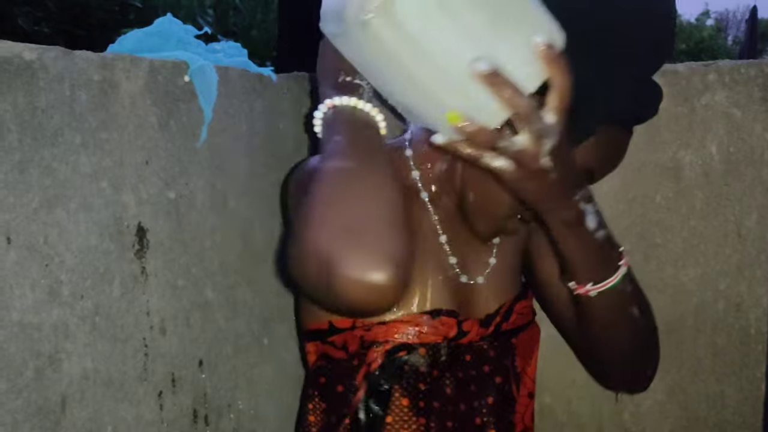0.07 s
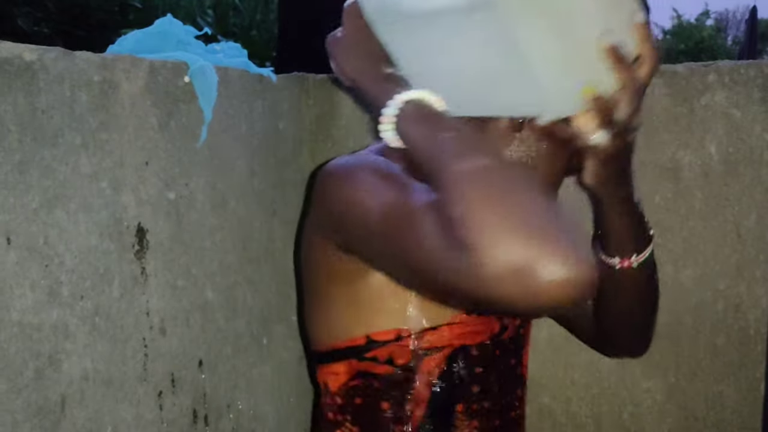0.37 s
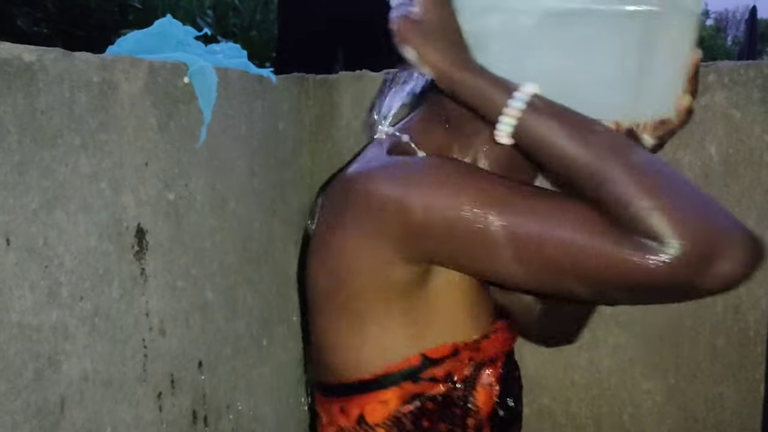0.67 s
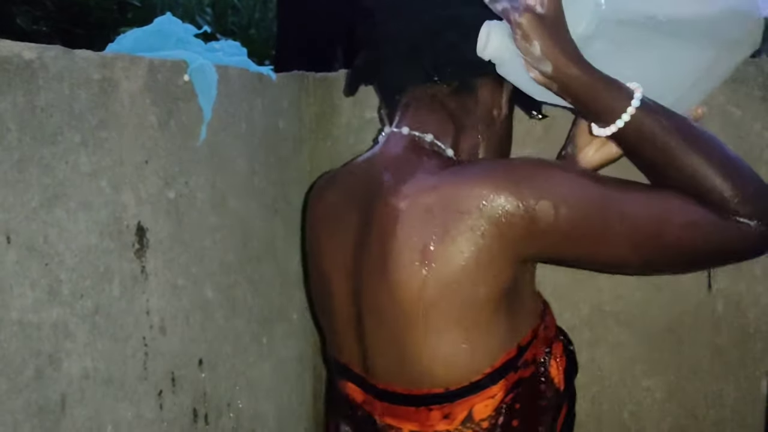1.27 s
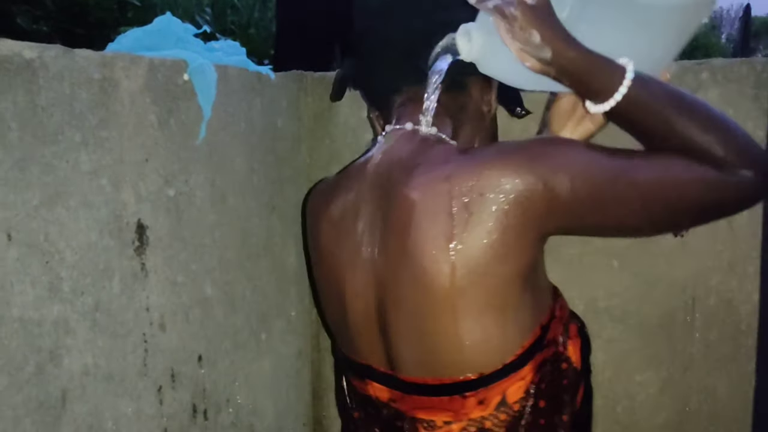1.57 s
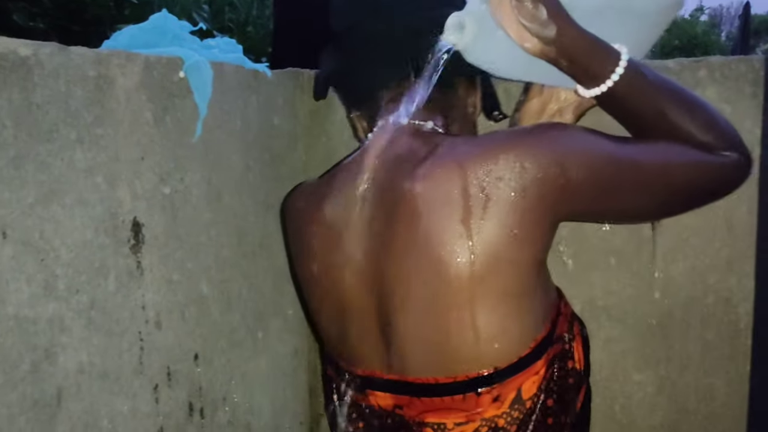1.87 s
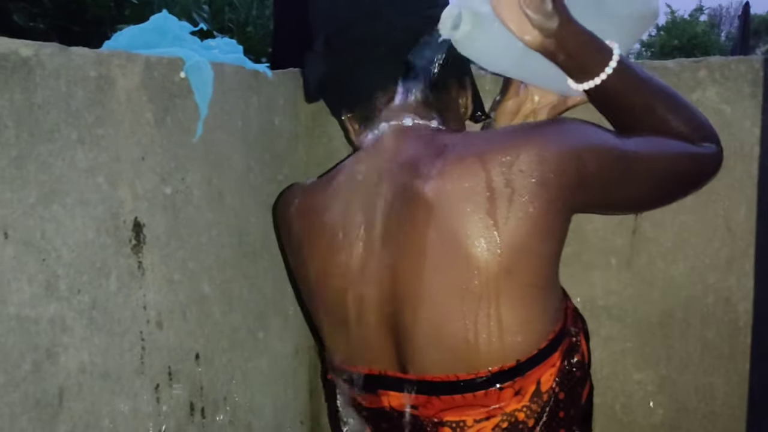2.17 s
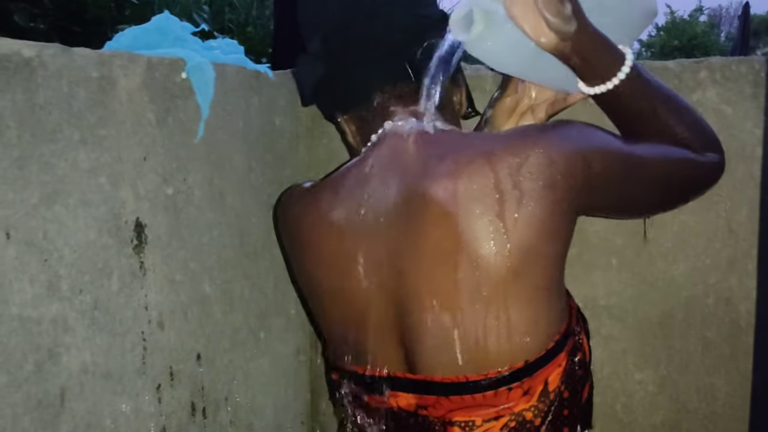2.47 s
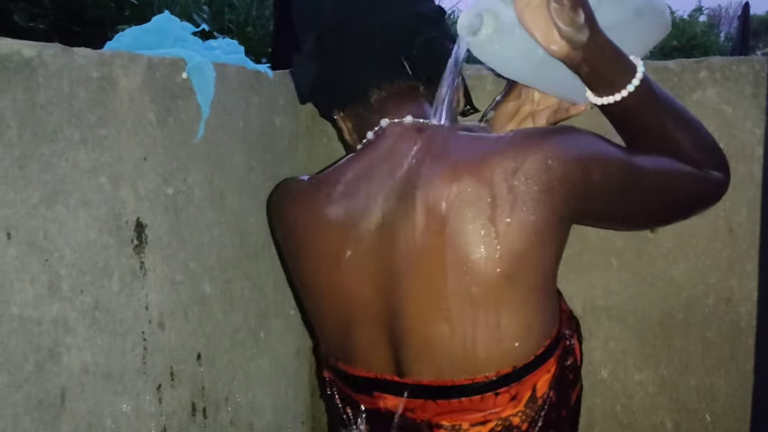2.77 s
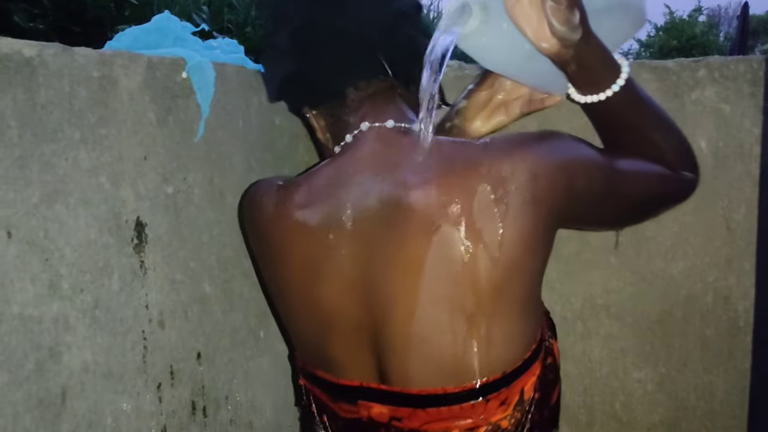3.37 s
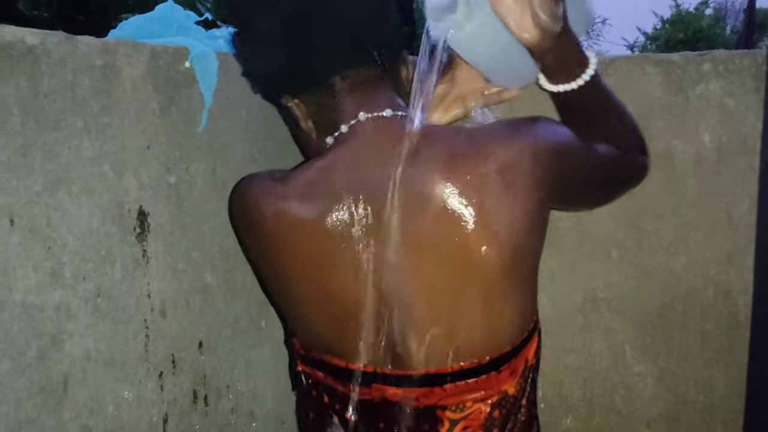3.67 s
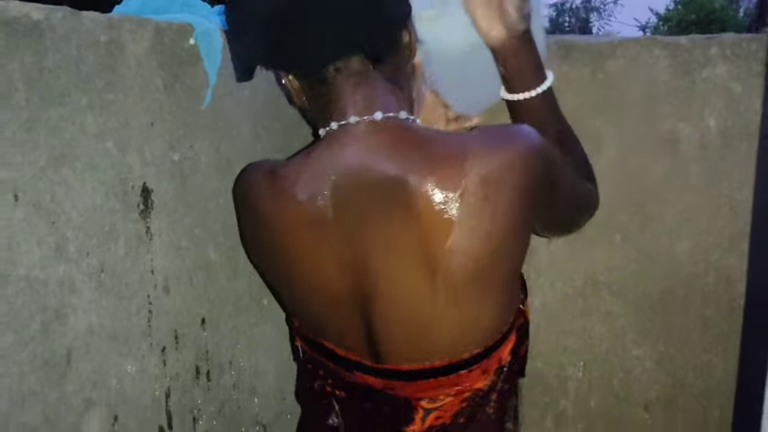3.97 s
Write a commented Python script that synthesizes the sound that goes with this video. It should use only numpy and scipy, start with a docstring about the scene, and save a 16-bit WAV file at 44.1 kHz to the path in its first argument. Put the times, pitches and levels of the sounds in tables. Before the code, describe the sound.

Water poured from a jug splashes unevenly over a body onto wet ground, with crickets buzzing.

```python
"""In a walled yard at dusk, crickets buzz throughout, their wing strokes exciting brief resonances.
From the start, water poured from a plastic jug over someone's shoulders trickles off and slaps on
the wet ground in uneven dollops, each a crowd of tiny impacts. Small bubbles ring as their trapped
air vibrates, and in the first two seconds the hollow jug gulps. The splashes thin out after three
seconds; at the very end come two more, and the walls of the jug thump once."""
import sys
import numpy as np
from scipy import signal
from scipy.fft import rfft, irfft
from scipy.io import wavfile

SR = 44100
rng = np.random.default_rng(int(sys.argv[2]) if len(sys.argv) > 2 else 0)


def waveform_to_disk(signal):
    """Save audio, clipped to [-1, 1], as 16-bit WAV at the path in sys.argv[1]."""
    frames = np.transpose(np.atleast_2d(signal))
    scaled = np.clip(frames, -1, 1) * 32767
    samples = np.round(scaled).astype(np.int16)
    wavfile.write(sys.argv[1], SR, samples)


N = 176400


def dollops():
    """Impact noise: lumps of water strike the wet ground at uneven intervals."""
    # Each row: start in seconds, relative slap and spray levels in dB, rise and decay in seconds,
    # low edge of the slap in Hz, treble gain in dB.
    splashes = [(0.118, -43, -26.5, 0.0054, 0.018, 2500, 8), (0.138, -43, -35, 0.003, 0.018, 2500, 18),
                (0.153, -31.5, -14, 0.0012, 0.0087, 2520, -18), (0.227, -39, -33.5, 0.005, 0.01, 2400, 5),
                (0.435, -36.5, -28, 0.001, 0.027, 2500, -3), (0.486, -43, -35, 0.001, 0.019, 2520, 12),
                (0.6, -39, -32, 0.001, 0.02, 2500, 8), (0.644, -41, -28, 0.004, 0.012, 2500, 14),
                (0.663, -44, -25.5, 0.0026, 0.017, 2500, 8), (0.7, -25.5, -21, 0.0013, 0.01, 2130, -1),
                (0.794, -41, -22.5, 0.00084, 0.02, 2500, -6), (0.849, -43, -30, 0.0036, 0.013, 2500, -4),
                (0.941, -26.5, -13, 0.00064, 0.015, 2200, -4.5),
                (0.975, -16, -15.5, 0.0025, 0.018, 2370, -3), (1.008, -50, -21, 0.0032, 0.0085, 2500, 4),
                (1.117, -27.5, -13, 0.0011, 0.0085, 2430, -6),
                (1.135, -32.5, -20.5, 0.01, 0.037, 2700, 5.5),
                (1.168, -26.5, -26.5, 0.0012, 0.022, 2960, -10), (1.229, -24, -21, 0.0096, 0.025, 2680, -8),
                (1.326, -35, -23, 0.014, 0.017, 2700, -1), (1.347, -25.5, -15.5, 0.0024, 0.012, 2600, -7),
                (1.372, -44, -22.5, 0.0043, 0.021, 2700, -5), (1.456, -20, -15.5, 0.0038, 0.023, 2300, -8),
                (1.471, -17, -22, 0.0012, 0.016, 2030, -4), (1.619, -21, -17, 0.0023, 0.011, 1590, -20),
                (1.642, -36, -24.5, 0.0031, 0.012, 2000, 5), (1.72, -34, -19.5, 0.003, 0.0095, 1700, -15),
                (1.797, -31, -20, 0.001, 0.023, 2800, -3), (2.109, -34, -21, 0.0023, 0.011, 2500, -3),
                (2.175, -36.5, -30, 0.0034, 0.0082, 2500, 5), (2.386, -34, -25, 0.0034, 0.053, 2550, -4),
                (2.505, -50, -25, 0.00092, 0.04, 2510, -25), (2.544, -36.5, -33.5, 0.0043, 0.049, 2600, 14),
                (2.586, -27, -18, 0.0012, 0.015, 2430, -17), (2.627, -24, -31, 0.00093, 0.016, 2800, -6),
                (2.686, -22.5, -19.5, 0.002, 0.014, 2920, -7), (2.764, -40, -29.5, 0.003, 0.019, 2300, 5),
                (2.783, -12, -19, 0.0013, 0.012, 2530, 0), (2.834, -41, -29, 0.002, 0.046, 2500, 6),
                (2.87, -25.5, -20.5, 0.00042, 0.019, 1860, 6),
                (2.906, -30.5, -19.5, 0.0027, 0.012, 2100, -3), (2.963, -32.5, -31, 0.011, 0.017, 2400, 4),
                (3.089, -40, -26, 0.001, 0.0079, 2500, 0), (3.112, -32, -13, 0.00091, 0.002, 2300, 4),
                (3.116, -26.5, -17, 0.001, 0.029, 1970, -3), (3.567, -46, -23, 0.00082, 0.009, 2500, -16),
                (3.695, -42, -30.5, 0.00097, 0.059, 2480, 1), (3.772, -49, -23, 0.0025, 0.016, 2500, 6.5),
                (3.942, -21.5, -13.5, 0.00092, 0.026, 1690, 1), (3.985, -29, -20, 0.0074, 0.005, 1700, -4)]
    out = np.zeros(N)
    for start, *settings in splashes:
        add(out, start, splash(*settings))
    return out


def splash(slap_db, spray_db, rise, decay, edge_hz, fizz_db, fizz_hz=9100, ripple_db=3.5):
    """Superposition: a dying crowd of tiny impacts merges into a slap and a brighter spray."""
    # Each row of both spectra: frequency in Hz, relative level in dB.
    slap_spectrum = [(300, -36), (900, -10.5), (2500, -1), (4500, 1), (6000, 1), (7500, 2), (9500, -33),
                     (16000, -39)]
    spray_spectrum = [(1000, -31.5), (3000, -38), (5200, -9), (6500, -5.5), (7500, 2.5), (8600, 2),
                      (10000, -13), (12500, -23), (14500, -27), (16000, -29)]
    t = np.arange(8192) / SR
    hz = np.fft.rfftfreq(len(t), 1 / SR)
    low_shelf_db = -9.5 / (1 + (hz / edge_hz) ** 14)
    high_shelf_db = fizz_db * (1 - 1 / (1 + (hz / fizz_hz) ** 20))

    def impacts(spectrum, shelf_db):
        """Dense clicks fuse into noise with a randomly rippled spectrum."""
        clicks = drops(len(t), per_s=20000, spread_db=2.1)
        return colour(clicks, spectrum, shelf_db + ripple_db * wander(len(hz), 60))

    slap = impacts(slap_spectrum, low_shelf_db + high_shelf_db)
    spray = impacts(spray_spectrum, high_shelf_db)
    slap *= burst(t, rise + 0.0018, decay)  # swells just after the spray
    spray *= burst(t, rise, decay, hold=0.002)
    return amp(slap_db + 2) * slap + amp(spray_db + 1.48) * spray


def air_pockets(rise=0.0043):
    """Cavity resonance: air squashed under the fattest dollops gives them a wet, hollow pitch."""
    # Each row: start in seconds, relative level in dB, pitch in Hz, decay in seconds.
    pockets = [(0.978, -34, 2730, 0.011), (1.168, -22.5, 3900, 0.016), (1.228, -28.5, 2800, 0.033),
               (1.238, -26, 3640, 0.016), (1.349, -31, 3050, 0.016), (1.471, -20, 2840, 0.025),
               (1.474, -22, 3920, 0.018), (1.621, -25, 2940, 0.019), (1.822, -31, 3000, .028),
               (2.786, -22, 2900, 0.0077), (2.788, -14, 5100, 0.015)]
    out, t = np.zeros(N), np.arange(8192) / SR
    for start, db, hz, decay in pockets:
        add(out, start, amp(db) * tick(hz, width=0.14, decay=decay) * np.minimum(t / rise, 1))
    return out


def trickle():
    """Shot noise: independent drops make a patter, droplets a mist, the finest spray a fizz."""
    # Each row: time in seconds, relative levels of the patter and of the mist in dB.
    flow = [(0, -39, -36.5), (.1, -48.5, -42), (.2, -42.5, -29), (.33, -43, -47), (.56, -42.5, -43),
            (.68, -39.5, -26.5), (.9, -37, -42), (1.08, -42, -36.5), (1.3, -44.5, -26.5), (1.7, -32.5, -30),
            (1.85, -33, -28), (1.91, -40, -43), (2.0, -40.5, -28.5), (2.35, -38, -34.5), (2.56, -40, -30),
            (2.73, -40, -35), (2.98, -40, -28.5), (3.24, -43.5, -42), (3.35, -38.5, -29.5),
            (3.54, -44.5, -49), (3.66, -46.5, -40), (3.8, -41, -31.5), (4, -47, -35)]
    # Each row: time in seconds, relative level in dB.
    fizz_levels = [(0, -59), (.1, -62), (.2, -50), (.28, -67), (.42, -64), (.52, -56), (.88, -63),
                   (1.08, -48), (1.2, -46), (1.4, -40), (1.65, -44), (1.83, -49), (1.91, -58), (2.0, -47.5),
                   (2.3, -52.5), (2.43, -44.5), (2.68, -55), (2.95, -50), (3.1, -45), (3.25, -57),
                   (3.33, -46), (3.53, -60), (3.62, -54), (3.8, -57), (4, -34)]
    # Each row of the three spectra: frequency in Hz, relative level in dB.
    patter_spectrum = [(600, -9), (1500, -6), (2700, 1.5), (4200, -1.5), (5400, 1.5), (7000, 0),
                       (9500, -26), (16000, -40)]
    mist_spectrum = [(3000, 14), (5200, -18), (6500, -5.5), (7500, 0.5), (8700, -0.5), (9600, -14),
                     (11000, -29), (16000, -40)]
    fizz_spectrum = [(8000, -3), (10000, -1), (12000, -1.5), (13000, -9), (16000, -2.5)]
    coarse = colour(patter(low_hz=1123, high_hz=7100, per_s=210, bands=36), patter_spectrum)
    mist = colour(patter(low_hz=5130, high_hz=9600, per_s=280, bands=18), mist_spectrum)
    fizz = colour(patter(low_hz=9200, high_hz=15200, per_s=170, bands=14), fizz_spectrum)
    out = amp(-3) * level(flow) * coarse
    out += amp(-2) * level(flow, column=2) * mist
    return out + amp(-0.5) * level(fizz_levels) * fizz


def patter(low_hz, high_hz, per_s, bands):
    """Random arrivals: separate drops of many pitches fall, the higher ones stronger."""
    out = np.zeros(N)
    for hz in np.geomspace(low_hz, high_hz, bands):
        drop = np.sqrt(hz) * tick(hz, width=0.14, decay=0.01)
        out += scatter(drop, per_s / bands, spread_db=3)
    return out


def bubbles(per_s=1600, glide_per_s=1.6, roughness=0.55):
    """Bubble resonance: a crowd of small bubbles gurgles over the skin; a few plinks stand out."""
    # Each row: time in seconds, relative level in dB.
    gurgle_levels = [(0, -62), (.19, -59.5), (.3, -44), (.45, -47), (.56, -62), (.7, -56), (.85, -42.5),
                     (1.1, -61), (1.33, -49), (1.5, -43), (1.66, -37.5), (1.8, -44), (2.0, -49.5),
                     (2.7, -59), (3.15, -48), (3.6, -56), (4, -41.5)]
    # Each row: frequency in Hz, relative level in dB.
    gurgle_spectrum = [(300, -17), (600, -7), (1000, 4), (1800, 0), (2800, 8), (5000, -39)]
    # Each row: start in seconds, relative level in dB, pitch in Hz.
    plinks = [(.236, -33, 2950), (0.316, -33, 2070), (.32, -40, 1130), (.745, -31.5, 1160),
              (0.748, -27, 2555), (1.388, -28, 1463), (1.447, -28, 1043), (1.576, -27.5, 1875),
              (1.702, -21.5, 1605), (1.722, -31.5, 1150), (1.915, -35.5, 997), (1.925, -34.5, 4080),
              (2.105, -26, 4320), (2.229, -31.5, 2650), (2.265, -21, 3920), (2.307, -37, 2120),
              (2.333, -31, 2600), (2.351, -32, 2570), (2.413, -35, 3940), (2.548, -29, 3800),
              (2.554, -36, 830), (2.629, -18.5, 3650), (3.4, -31.5, 3810), (3.448, -37.5, 1080),
              (3.652, -32, 2590), (3.764, -29.5, 4200), (3.793, -31, 945), (3.83, -35, 3590)]
    crowd = np.zeros(N)
    pitches = np.geomspace(420, 4000, 40)
    for hz in pitches:
        bubble = ring(hz, rise=1 / hz, decay=3 / hz, glide_per_s=glide_per_s)
        crowd += scatter(bubble, per_s / len(pitches), spread_db=4.5)
    out = amp(-1.5) * level(gurgle_levels) * colour(crowd, gurgle_spectrum)
    for start, db, hz in plinks:
        tone = ring(hz, rise=0.001, decay=0.012, glide_per_s=glide_per_s)
        splatter = tick(hz, width=0.18, decay=0.01)
        add(out, start, amp(db) * ((1 - roughness) * tone + roughness * splatter))
    return echoes(out, t60=0.027, wet_db=-7)


def jug(rise=0.0089):
    """Cavity resonance: over sloshing water, each gulp rings two hollow tones that bend upwards."""
    # Each row: time in seconds, level in dB.
    slosh_levels = [(0, -57), (.3, -55.5), (.5, -52.5), (.8, -50), (1.0, -47.5), (1.15, -62), (1.4, -55),
                    (1.6, -52), (1.65, -39), (1.71, -49.5), (1.95, -53), (2.1, -55), (3.85, -57.5),
                    (4, -49)]
    # Each row: frequency in Hz, relative level in dB.
    slosh_spectrum = [(60, -38), (120, -16), (170, 2), (270, 2), (450, 0), (620, -10), (850, -2),
                      (1300, -10), (2500, -24)]
    # Each row: start in seconds, lower pitch in Hz, its relative level in dB, upper pitch in Hz,
    # its relative level in dB, decay in seconds.
    gulps = [(0.128, 286, -51, 430, -34, 0.0087), (0.365, 247, -42.5, 388, -39, .012),
             (0.631, 274, -39, 417, -47, 0.036), (0.709, 230.5, -36.5, 307, -52, 0.042),
             (.752, 165, -32.5, 258, -36.5, 0.026), (0.819, 233, -39, 440, -62, .02),
             (0.865, 271, -24, 440, -21.5, 0.0093), (.924, 297, -32.5, 423, -38, 0.018),
             (1.02, 273, -46, 436, -50, 0.04), (1.639, 178, -31, 380, -35, 0.011),
             (1.805, 254, -39.5, 422, -56, 0.032), (1.849, 256, -36, 347, -53, 0.011)]
    out = level(slosh_levels) * colour(drops(N, per_s=500, spread_db=0), slosh_spectrum)
    t = np.arange(8192) / SR
    for start, low_hz, low_db, high_hz, high_db, decay in gulps:
        for hz, db in (low_hz, low_db), (high_hz, high_db):
            tone = ring(hz, rise, decay, glide_per_s=2.46)
            churn = tick(hz, width=0.45, decay=decay) * np.minimum(t / rise, 1)
            add(out, start, amp(db) * (tone + amp(-5.5) * churn))
    return out


def thump(start=3.9803, rise=0.003, decay=0.049):
    """Damped wall modes: the plastic jug booms once, with a burst of dull noise."""
    # Each row: frequency in Hz, peak level in dB.
    modes = [(265, -15), (455, -18), (595, -15), (1270, -31.5)]
    # Each row: frequency in Hz, relative level in dB.
    body_spectrum = [(60, -24), (150, 1), (250, 2), (400, 0), (600, 8.5), (780, -4), (1000, -16),
                     (1400, -10), (2200, -35)]
    out, t = np.zeros(N), np.arange(8192) / SR
    envelope = np.minimum(t / rise, 1) * np.exp(-t / decay)
    body = colour(rng.standard_normal(len(t)), body_spectrum) * envelope
    tones = sum(amp(db) * ring(hz, rise, decay) for hz, db in modes)
    add(out, start, amp(-16) * body + tones)
    return out


def near_crickets(rise=0.00076, decay=0.001, sweep_hz_per_s=-50000, flutter_db=4):
    """Stridulation: each fast wing stroke excites a brief resonance that falls in pitch."""
    # Each row: pitch in Hz, wing strokes per second, level in dB.
    crickets = [(7080, 69.3, -31.5), (6830, 90, -38), (6455, 64.4, -36)]
    out, t = np.zeros(N), np.arange(1024) / SR
    envelope = (1 - np.exp(-t / rise)) * np.exp(-t / decay)
    for hz, per_s, db in crickets:
        stroke_rate = per_s * (1 + 0.008 * wander(N, 9000))
        strokes = np.diff(np.floor(np.cumsum(stroke_rate) / SR), prepend=0)
        strokes *= amp(flutter_db * np.tanh(wander(N, 700)))
        wing = envelope * np.sin(2 * np.pi * t * (hz + sweep_hz_per_s * (t / 2 - decay)))
        buzz = signal.oaconvolve(strokes, wing)[:N]
        out += amp(db) * unit(echoes(buzz, t60=0.25, wet_db=1.5))
    return out


def far_crickets(trill_hz=6993, waver_hz=7, flutter_db=4):
    """Incoherent summation: distant calls merge into a band of hiss, beside one thin trill."""
    # Each row: frequency in Hz, relative level in dB.
    chorus_spectrum = [(4500, -29.5), (5600, -49), (5900, -3), (6200, -15), (6400, 1.5), (7000, 1.5),
                       (7250, 2), (7500, -12), (8300, -22), (10000, -40)]
    chorus = colour(rng.standard_normal(N), chorus_spectrum)
    pitch = trill_hz + waver_hz * wander(N, 1485)
    trill = np.sin(2 * np.pi * np.cumsum(pitch) / SR) * amp(flutter_db * wander(N, 2520))
    return amp(-30.7) * chorus + amp(-38.5) * unit(trill)


def evening_air():
    """Stationary noise: a faint, steady rumble and hiss lie under everything."""
    # Each row: frequency in Hz, relative level in dB.
    air_spectrum = [(25, 3), (55, -4), (100, -11.5), (200, -9), (400, -17.5), (700, -25.5), (1500, -29),
                    (3000, -19), (5500, -28.5), (9000, -45)]
    return amp(-51.5) * colour(rng.standard_normal(N), air_spectrum)


def ring(hz, rise, decay, glide_per_s=0):
    """Damped oscillation: a tone dies away, rising by a share of its pitch per second."""
    t = np.arange(8192) / SR
    return burst(t, rise, decay) * np.sin(2 * np.pi * hz * t * (1 + glide_per_s * t / 2))


def tick(hz, width, decay):
    """Band-limited noise: a short wet rustle around a pitch; width is a share of that pitch."""
    t = np.arange(8192) / SR
    band = 1 / (1 + ((np.fft.rfftfreq(len(t), 1 / SR) / hz - 1) / width) ** 4)
    rustle = unit(irfft(rfft(rng.standard_normal(len(t))) * band))
    return rustle * np.minimum(t * hz / 2, 1) * np.exp(-t / decay)


def burst(t, rise, decay, hold=0):
    """Exponential decay after a linear attack and a hold, all in seconds."""
    return np.minimum(t / max(rise, 1e-4), 1) * np.exp(-np.maximum(t - rise - hold, 0) / decay)


def drops(count, per_s, spread_db):
    """Poisson process: clicks of random time, sign and size."""
    chance = rng.random(count) * SR / per_s
    at, out = np.flatnonzero(chance < 1), np.zeros(count)
    sign = 1 - 2 * (at % 2)
    out[at] = sign * amp(spread_db * np.minimum(-np.log(chance[at] + 1e-9), 4))
    return out


def scatter(sound, per_s, spread_db):
    """Superposition: a small sound repeats at random times and strengths."""
    out, hits = np.zeros(N), drops(N, per_s, spread_db)
    for at in np.flatnonzero(hits):
        add(out, at / SR, hits[at] * sound[:3072])
    return out


def echoes(x, t60, wet_db):
    """Reverberation: scattered reflections from ground and walls fall 60 dB in t60 seconds."""
    t = np.arange(SR // 2) / SR
    tail = drops(len(t), per_s=2500, spread_db=1) * amp(-60 * t / t60) * (t > .002)
    wet = signal.fftconvolve(x, tail / np.linalg.norm(tail))[:N]
    return (x + amp(wet_db) * wet) / np.sqrt(1 + amp(2 * wet_db))


def colour(x, spectrum, extra_db=0):
    """Spectral shaping: filters by a curve that rolls off beyond its ends; the result has rms 1."""
    knots_hz, db = np.transpose(spectrum)
    hz = np.fft.rfftfreq(len(x), 1 / SR)
    shape_db = np.interp(np.log(hz + 1), np.log(knots_hz), db) + extra_db
    skirts = 1 / np.sqrt((1 + (knots_hz[0] / 2 / (hz + 1)) ** 4) * (1 + (hz / knots_hz[-1] / 2) ** 4))
    return unit(irfft(rfft(x) * amp(shape_db) * skirts, len(x)))


def level(rows, column=1):
    """Amplitude envelope: gain over time from one dB column of a table."""
    rows = np.array(rows)
    return amp(np.interp(np.arange(N) / SR, rows[:, 0], rows[:, column]))


def wander(count, step):
    """Random modulation: a curve joins Gaussian values set step samples apart."""
    knots = rng.standard_normal(1024)
    return np.interp(np.arange(count) / step, np.arange(len(knots)), knots)


def add(mix, start, sound):
    """Linear mixing: adds a sound at a start time in seconds."""
    part = mix[max(round(start * SR), 0):][:len(sound)]
    part += sound[:len(part)]


def amp(db):
    """Amplitude ratio from decibels."""
    return 10 ** (np.asarray(db) / 20)


def unit(x):
    """Normalisation to rms 1."""
    return x / np.sqrt(np.mean(x ** 2) + 1e-20)


def scene():
    """Superposition: the water and its reflections in the yard join the thump, crickets and air."""
    water = dollops() + air_pockets() + trickle() + bubbles() + jug()
    water = echoes(water, t60=0.057, wet_db=-8.5)
    return (water + thump() + near_crickets() + far_crickets() + evening_air())[None]


def record(dry):
    """Band limiting: a low-pass filter removes the treble above 15850 Hz."""
    low_pass = signal.firwin(511, 15850, window=("kaiser", 8), fs=SR)
    return signal.oaconvolve(dry, low_pass[None], "same")


dry = scene()
out = record(dry)
waveform_to_disk(out)
```